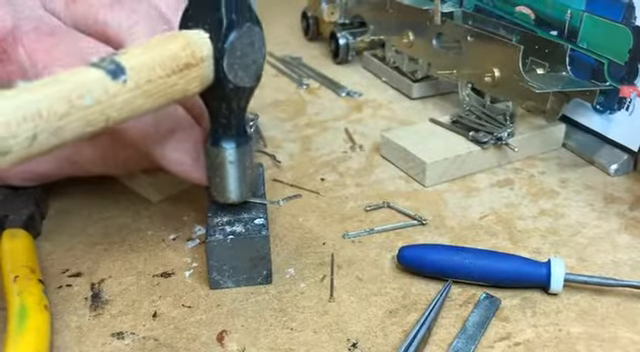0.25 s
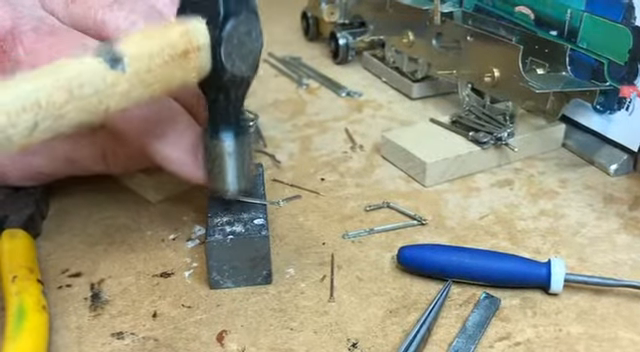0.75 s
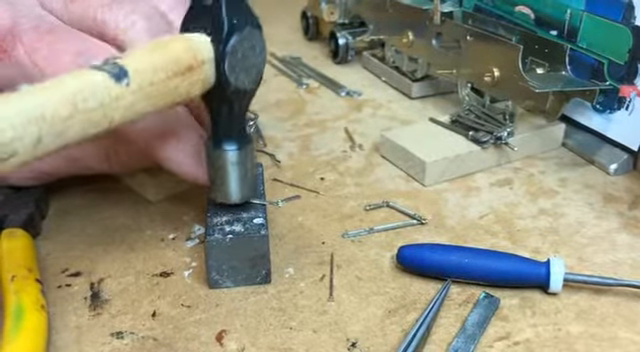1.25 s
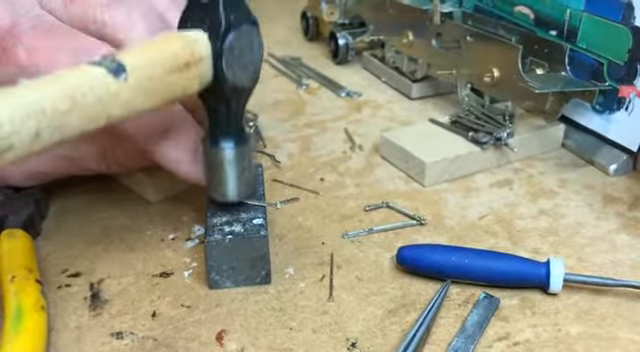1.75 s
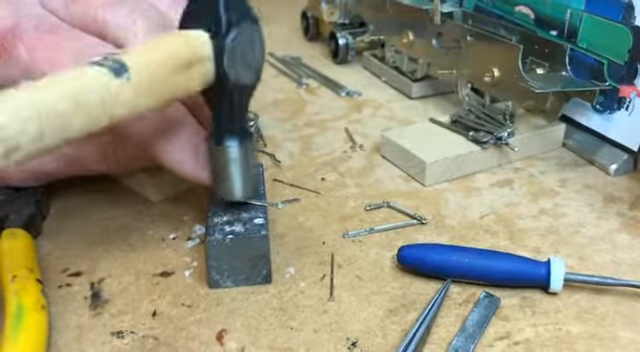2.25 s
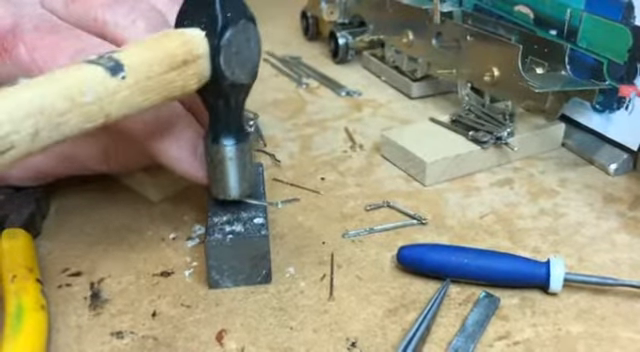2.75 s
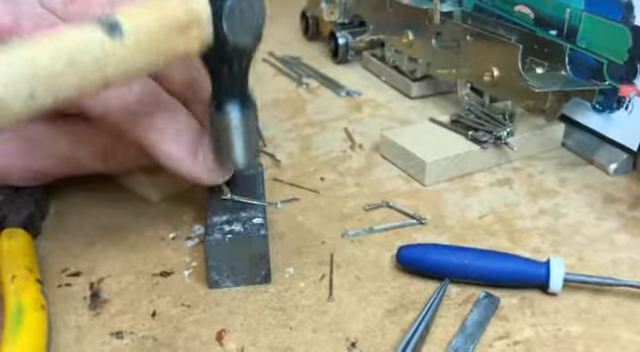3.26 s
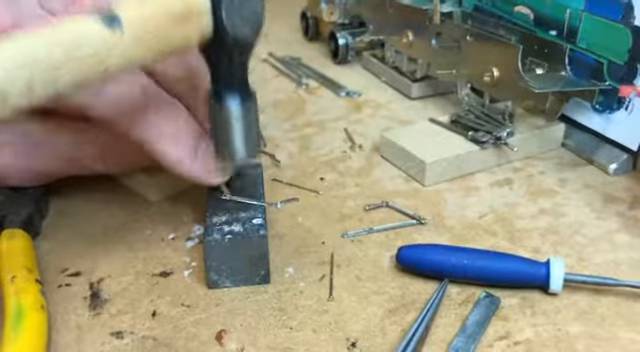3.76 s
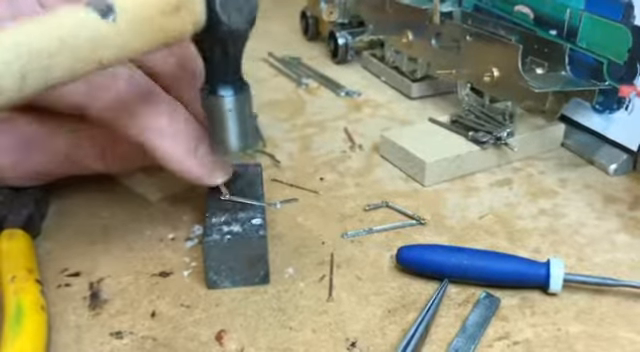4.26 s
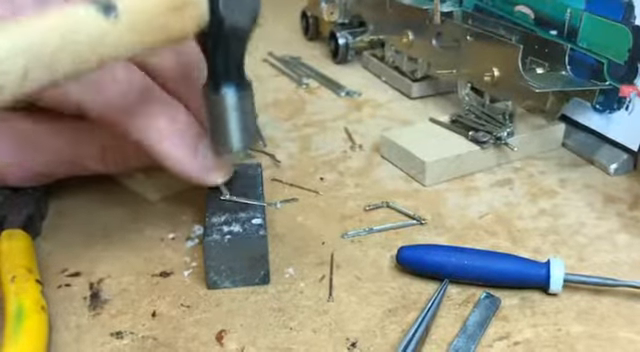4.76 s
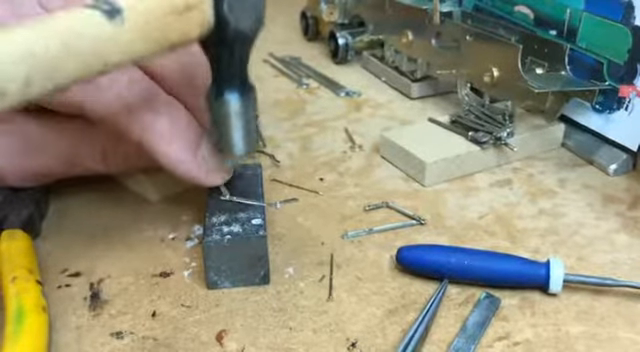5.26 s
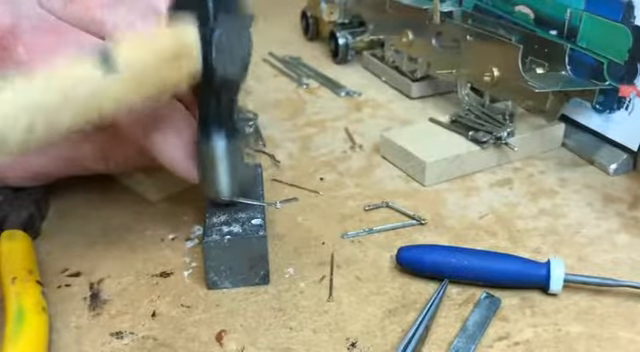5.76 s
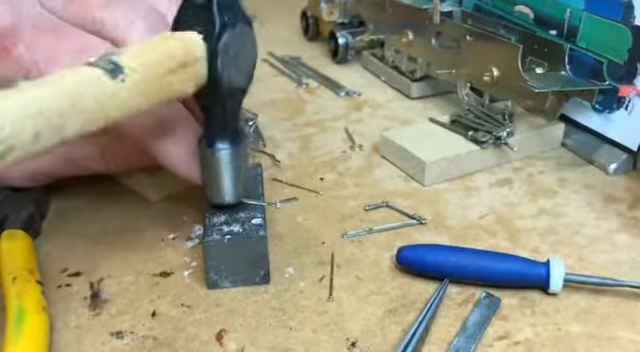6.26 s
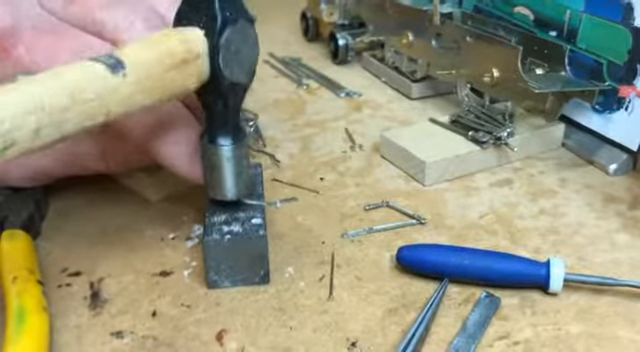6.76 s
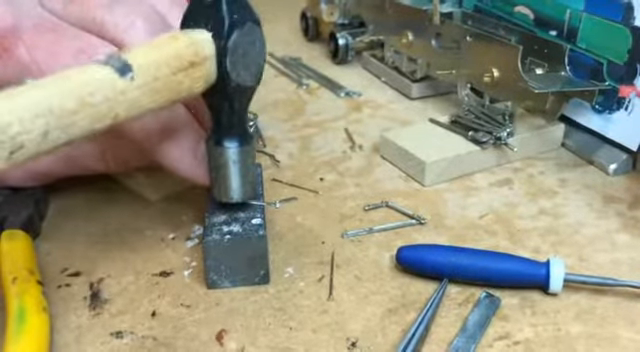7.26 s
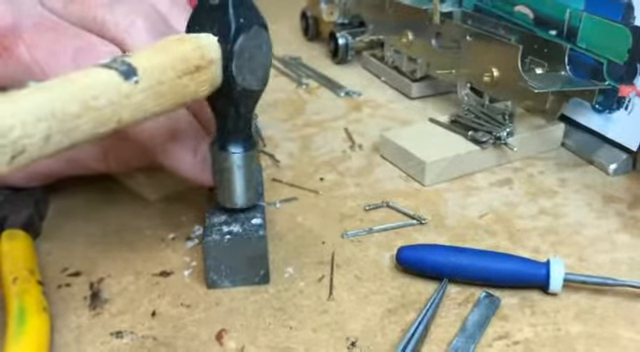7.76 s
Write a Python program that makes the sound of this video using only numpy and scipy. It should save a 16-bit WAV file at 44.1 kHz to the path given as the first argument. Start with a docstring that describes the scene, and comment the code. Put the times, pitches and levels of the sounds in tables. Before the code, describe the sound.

Close up at a wooden workbench in a small room, a light hammer peens metal in a quick, steady run of some thirty taps. Early strikes are muffled knocks; later ones are crisp, metallic clacks with more tool chatter and a thin, very high steel ring that varies from blow to blow. Low hum and faint hiss lie underneath. The run ends with two barely audible ticks.

```python
"""Hammer taps, about four a second, begin dull and brighten as a rivet is peened on a steel block.
Work hardening shortens the contact pulse, a low-pass filter whose corner rises from tap to tap.
Each pulse drives decaying modes of block and wooden bench, and a diffuse noise tail of a small room.
Loose tools chatter as filtered random clicks, and the steel rings thinly as two decaying sines.
Two light ticks end the work; low noise, two hum tones and a faint hiss lie behind it."""
import sys
import numpy as np
from scipy import signal
from scipy.fft import rfft, irfft
from scipy.io import wavfile
from scipy.ndimage import uniform_filter1d, minimum_filter1d

SR = 44100
rng = np.random.default_rng(int(sys.argv[2]) if len(sys.argv) > 2 else 0)


def log_audio(samples):
    """Write samples as a 16-bit WAV file to the path given in sys.argv[1]."""
    # one column per channel
    frames = np.atleast_2d(samples).T
    # limit to full scale, then quantise
    limited = np.clip(frames, -1, 1)
    pcm = np.round(limited * 32767).astype(np.int16)
    wavfile.write(sys.argv[1], SR, pcm)


N = 352912

# taps; the steel rings more or less freely with the place struck: t/s, steel ring level/dB
TAP_TIMES = [(0.5004, -29), (0.7734, -12.5), (1.0131, -24), (1.2507, -11), (1.4829, -3), (1.7204, -13.5),
             (1.966, -14), (2.201, -25), (2.4491, -22), (2.701, -9), (2.9272, -19), (3.1683, -8.5),
             (3.4081, 1.5), (3.6512, -7.5), (3.889, -6.5), (4.135, -5), (4.366, -9), (4.5946, 0.5),
             (4.8453, 0), (5.0836, 0.5), (5.3315, -0.5), (5.5689, -4.5), (5.7962, -1.5), (6.0283, -6.5),
             (6.2591, -12.5), (6.4904, -6.5), (6.7166, 0), (6.9458, -6), (7.1835, -13), (7.4212, -19.5),
             (7.6458, -8)]
# modes of hammer and block knocking together: f/Hz, level/dB, T60/s
BLOCK_MODES = [(710, -3, 0.014), (1491, 2, 0.011), (2040, 0.5, 0.006), (3077, -0.5, 0.0082),
               (3750, -0.5, 0.0063), (4320, -9.5, 0.008)]
# modes of the bench top: f/Hz, level/dB, T60/s
BENCH_MODES = [(137.4, -35.5, 0.24), (171, -28, 0.1), (236.8, -19.5, 0.095), (273, -16.5, 0.12),
               (331, -40.5, 0.095), (364.7, -13, 0.064), (402, -17.5, 0.035), (524.5, -14.5, 0.058),
               (606.2, -22.5, 0.12), (729.7, -16, 0.058), (860, -30, 0.045), (1131, -29, 0.19),
               (1190, -14.5, 0.054), (1300, -41, 0.067), (1420, -21, 0.13), (1606, -32.5, 0.26),
               (1510, -36, 0.113), (1713, -11, 0.047), (1726, -23, 0.094), (1850, -39.5, 0.089),
               (1938, -23, 0.11), (2027, -28, 0.14), (2050, -30, 0.047), (2320, -28.5, 0.13),
               (2490, -19, 0.038), (2782, -28.5, 0.051), (2931, -20, 0.073), (3660, -23.5, 0.09),
               (4550, -16, 0.019), (5884, -12, 0.018)]
# modes of the bench giving way under the block: f/Hz, level/dB, T60/s
THUMP_MODES = [(392, 3, 0.004), (517, -5.5, 0.014), (1354, -37.5, 0.033)]
# two rings of the steel, at a ring level of 0 dB: f/Hz, level/dB, T60/s
STEEL_MODES = [(11203, -38.5, .13), (12547, -49, 1.1)]
# share of a tap's ring level that each steel mode follows: share/1
STEEL_SHARES = (.7, 1)
# faint ticks ahead of each tap, relative to its force: t ahead/s, level/dB
EARLY_TICKS = [(.023, -41), (.011, -43)]
# spectrum of the room's reflections: f/Hz, level/dB
ROOM_SPECTRUM = [(30, -55.5), (70, -24.5), (150, -10.5), (300, -9.5), (650, -10.5), (900, -12.5),
                 (1500, -9), (2000, -9.5), (2400, -17.5), (3100, -14), (4000, -16.5), (5200, -23),
                 (8000, -21), (16000, -25.5)]
# decay time of the room: f/Hz, T60/s
ROOM_DECAY = [(80, 0.31), (250, 0.25), (600, 0.19), (1700, 0.31), (3500, 0.22), (6500, 0.19),
              (14000, 0.092)]
# relative spectrum of loose tools and wire jumping on the bench: f/Hz, level/dB
RATTLE_SPECTRUM = [(500, -18.5), (2500, -11), (6000, 0), (7500, -7.5), (9400, -5), (10300, -14.5),
                   (12500, -11), (15500, -18.5)]
# light ticks as the hammer is lifted away: t/s, level/dB
LIFT_TICKS = [(7.888, -50), (7.921, -55.5)]
# relative spectrum of the steady workshop noise: f/Hz, level/dB
FLOOR_SPECTRUM = [(20, -14), (45, -13), (80, -12), (110, -6), (190, -7), (360, -8), (700, -19), (1100, -22),
                  (1650, -18), (2300, -31), (8000, -34), (15000, -37)]
# relative spectrum of the faint hiss, shared by the lifting ticks: f/Hz, level/dB
HISS_SPECTRUM = [(100, 3), (400, 0), (1000, -4), (1800, -4), (3500, -6), (6500, -6), (10000, -9),
                 (15500, -13)]
# steady low tones of the workshop: f/Hz, rms level/dB
HUM_TONES = [(102, -67.5), (134.6, -76)]

# contact corner on the soft and the fully hard rivet; taps to get about two thirds as stiff
SOFT_HZ, HARD_HZ, HARDENING_TAPS = 750, 6550, 40.2
# tap on the soft rivet, gain per octave of shorter contact, unevenness of the hand
FORCE_DB, FORCE_DB_PER_OCTAVE, FORCE_SCATTER_DB = -2.08, 1.28, 0.11
# the same for loose metal, which a sharper shock shakes harder
RATTLE_DB, RATTLE_DB_PER_OCTAVE, RATTLE_SCATTER_DB = -36, 2.5, 0.27
# rms levels of noise and hiss; the hiss fades in once
FLOOR_DB, HISS_DB, HISS_START_S, HISS_RISE_S = -64.5, -64.5, 0.74, 0.12
EDGE_HZ = 16050  # upper band limit


def hammering(room_db=-1, drift=0.42, thump_delay_s=0.003338):
    """Linear superposition: each contact pulse excites the same block, bench and room."""
    t = np.arange(SR // 2) / SR
    out = np.zeros(N)
    crack, walls, swell = ring(BLOCK_MODES, t), room_tail(t), lead_in(t)
    body = crack + ring(BENCH_MODES, t)
    # the heavy bench gives way a few milliseconds after the crack
    add(body, thump_delay_s, ring(THUMP_MODES, t))
    for taps_done, (s, _) in enumerate(TAP_TIMES):
        corner_hz = contact_hz(taps_done)
        octaves = np.log2(corner_hz / SOFT_HZ)
        hand, luck = rng.standard_normal(2)
        force_db = FORCE_DB + FORCE_DB_PER_OCTAVE * octaves + FORCE_SCATTER_DB * hand
        rattle_db = RATTLE_DB + RATTLE_DB_PER_OCTAVE * octaves + RATTLE_SCATTER_DB * luck
        # the moving hand and hammer change part of the reflections from tap to tap
        room = (walls + drift * room_tail(t)) / np.hypot(1, drift)
        add(out, s, amp(force_db) * contact(body + amp(room_db) * room, corner_hz))
        add(out, s, amp(rattle_db) * rattle(t))
        add(out, s - len(swell) / SR, amp(force_db) * contact(swell, corner_hz))
        for ahead_s, tick_db in EARLY_TICKS:
            add(out, s - ahead_s, amp(force_db + tick_db) * contact(crack, corner_hz))
    return out


def contact_hz(taps_done):
    """Work hardening: stiffness nears its limit exponentially; the corner follows its square root."""
    hardness = 1 - np.exp(-taps_done / HARDENING_TAPS)
    return np.sqrt(SOFT_HZ ** 2 + hardness * (HARD_HZ ** 2 - SOFT_HZ ** 2))


def contact(x, corner_hz):
    """Contact low-pass: a longer contact between face and rivet passes less treble."""
    b, a = signal.butter(3, min(corner_hz, SR / 3), fs=SR)
    return signal.lfilter(b, a, x)


def ring(modes, t):
    """Modal decay: exponentially dying sines, with the sign alternating along the table."""
    out = 0
    for k, (hz, db, t60) in enumerate(modes):
        out = out + (-1) ** k * amp(db - 60 * t / t60) * np.sin(2 * np.pi * hz * t)
    return out


def lead_in(t, hz=3070, db=-33, t60=0.046):
    """Time-reversed modal decay: a thin, faint tone swells over the 30 ms before the crack."""
    return ring([(hz, db, t60)], t[t < 0.03])[::-1]


def rattle(t, start_s=0.0014, t60=0.11, size_db=0.5, clicks_per_s=5000, first_db=-6):
    """Random impacts: the rivet chatters at once, the tools when the shock has crossed the bench."""
    clicks = rng.standard_normal(len(t)) * (rng.random(len(t)) < clicks_per_s / SR)
    clicks = clicks * amp(size_db * np.minimum(rng.exponential(1, len(t)), 3))
    # quieter until the tools join in
    level_db = first_db * (t < start_s) - 60 * t / t60
    return evened(coloured(clicks, RATTLE_SPECTRUM)) * amp(level_db)


def room_tail(t, rise_s=0.0023):
    """Diffuse reverberation: dense reflections build up, then each band dies at its own rate."""
    noise = coloured(rng.standard_normal(len(t)), ROOM_SPECTRUM)
    hz, at, bands = signal.stft(noise, SR, nperseg=256)
    decay = amp(-60 * at / read(ROOM_DECAY, hz)[:, None])
    tail = signal.istft(bands * decay, SR, nperseg=256)[1][:len(t)]
    return tail * (1 - np.exp(-(t / rise_s) ** 2))


def steel(rise_s=0.0017):
    """Free vibration and damping: the steel sings thinly until the next tap stops it."""
    out = np.zeros(N)
    ends = [row[0] for row in TAP_TIMES[1:]] + [N / SR]
    for (s, ring_db), end in zip(TAP_TIMES, ends):
        t = np.arange(0, end - s + rise_s, 1 / SR)
        # short linear fades at both ends
        held = np.minimum(np.minimum(t, t[-1] - t) / rise_s, 1)
        tone = sum(amp(share * ring_db) * ring([mode], t) for share, mode in zip(STEEL_SHARES, STEEL_MODES))
        add(out, s, held * tone)
    return out


def lifting(t60=0.042):
    """Broadband transients: decaying noise gives small ticks as the hammer leaves the work."""
    t = np.arange(SR // 10) / SR
    out = np.zeros(N)
    for s, db in LIFT_TICKS:
        noise = evened(coloured(rng.standard_normal(len(t)), HISS_SPECTRUM))
        add(out, s, amp(db - 60 * t / t60) * noise)
    return out


def background():
    """Stationary noise and tones: low room noise, a hum and a faint hiss that fades in."""
    t = np.arange(N) / SR
    floor = evened(coloured(rng.standard_normal(N), FLOOR_SPECTRUM))
    hiss = evened(coloured(rng.standard_normal(N), HISS_SPECTRUM))
    # a sine's peak is sqrt(2) times its rms
    hum = sum(np.sqrt(2) * amp(db) * np.sin(2 * np.pi * (hz * t + rng.random())) for hz, db in HUM_TONES)
    hiss_fade = np.clip((t - HISS_START_S) / HISS_RISE_S, 0, 1)
    return amp(FLOOR_DB) * floor + hum + amp(HISS_DB) * hiss_fade * hiss


def amp(db):
    """Decibel law: converts a level to an amplitude gain."""
    return 10 ** (np.asarray(db) / 20)


def evened(x):
    """Power normalisation: scales to an rms of one."""
    return x / np.sqrt(np.mean(x ** 2) + 1e-20)


def read(points, hz):
    """Linear interpolation of tabulated values on a log-frequency axis."""
    f, value = np.transpose(points)
    return np.interp(np.log(hz + 1), np.log(f + 1), value)


def coloured(x, spectrum):
    """Spectral shaping: weights each frequency by a tabulated level."""
    hz = np.fft.rfftfreq(len(x), 1 / SR)
    return irfft(rfft(x) * amp(read(spectrum, hz)), len(x))


def add(mix, s, sound):
    """Superposition: adds a sound to the mix in place, from time s in seconds."""
    part = mix[max(round(s * SR), 0):][:len(sound)]
    part += sound[:len(part)]


def scene():
    """Superposition of all sources at one close microphone."""
    return (hammering() + steel() + lifting() + background())[None]


def record(dry, low_hz=60):
    """Band limiting and gain control: deep bass is cut, peaks are limited, then the top is cut."""
    b, a = signal.butter(2, low_hz, "highpass", fs=SR)
    x = signal.lfilter(b, a, dry)
    # the gain dips around each peak above full scale, smoothed over about 1 ms
    gain = minimum_filter1d(1 / np.maximum(abs(x), 1), size=45)
    gain = uniform_filter1d(gain, size=45)
    lowpass = signal.firwin(511, EDGE_HZ, window=("kaiser", 9), fs=SR)
    return signal.oaconvolve(x * gain, lowpass[None], "same")


dry = scene()
out = record(dry)
log_audio(out)
```